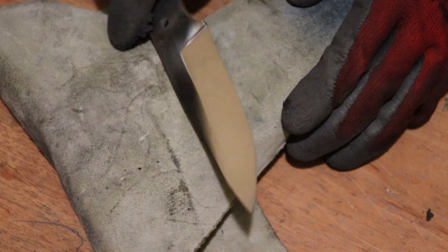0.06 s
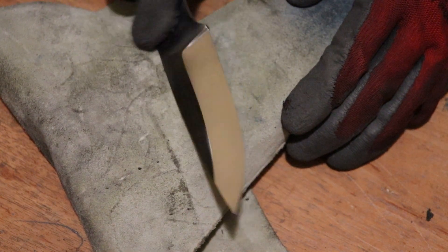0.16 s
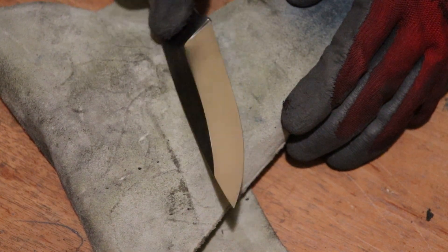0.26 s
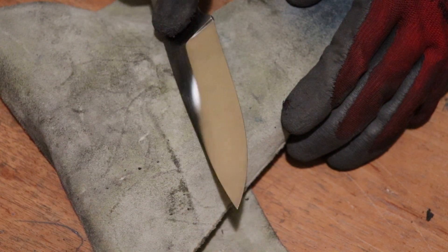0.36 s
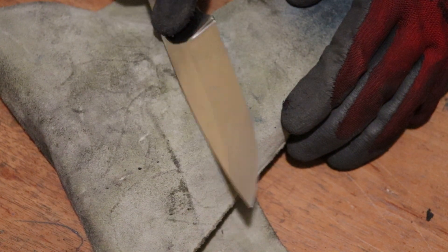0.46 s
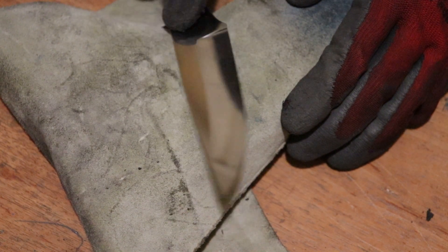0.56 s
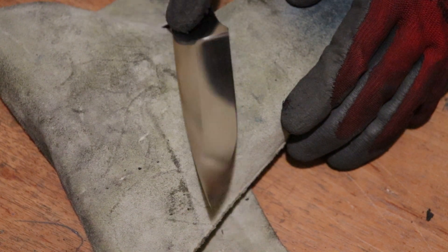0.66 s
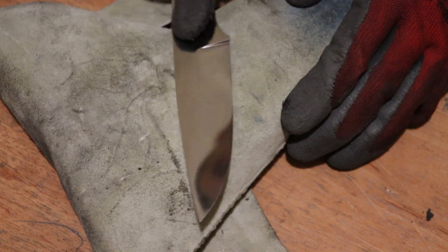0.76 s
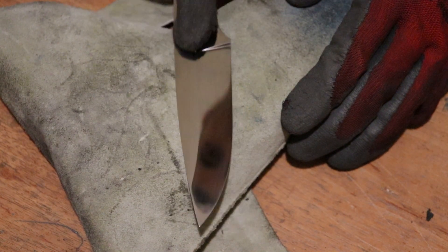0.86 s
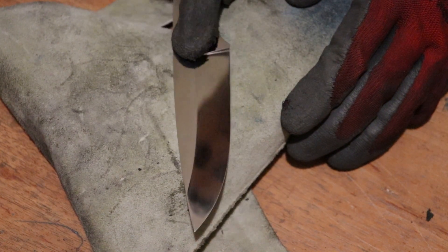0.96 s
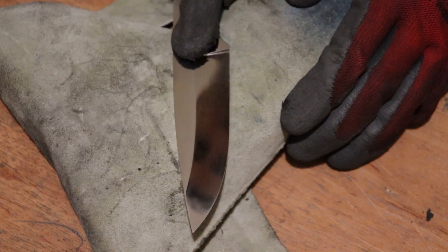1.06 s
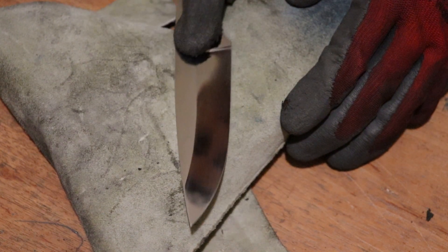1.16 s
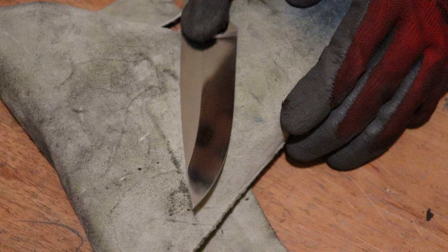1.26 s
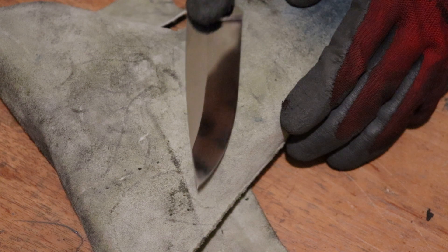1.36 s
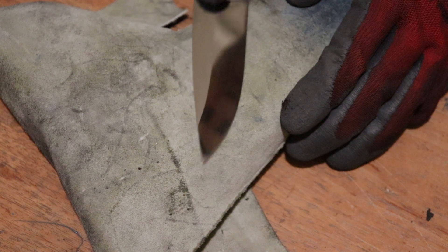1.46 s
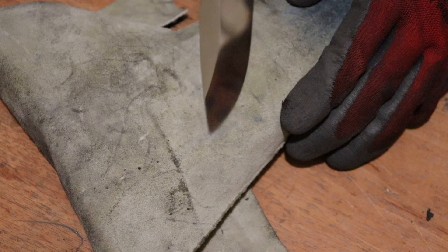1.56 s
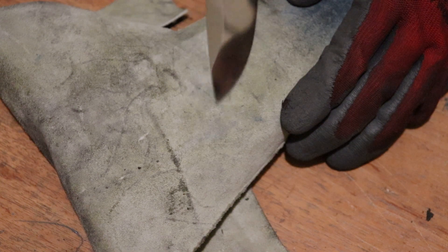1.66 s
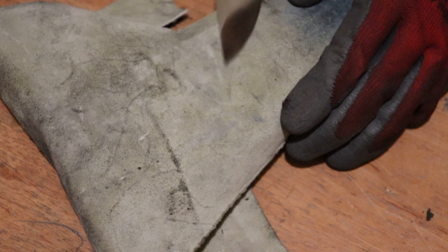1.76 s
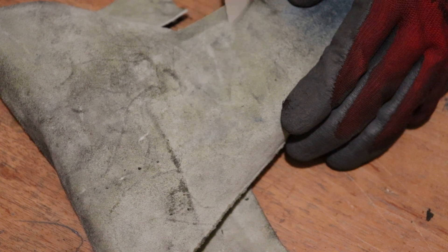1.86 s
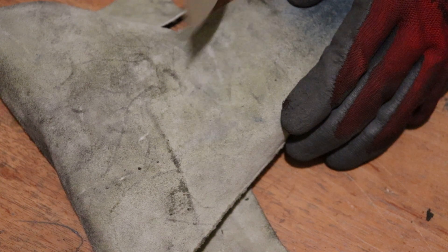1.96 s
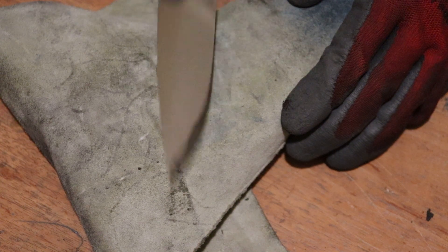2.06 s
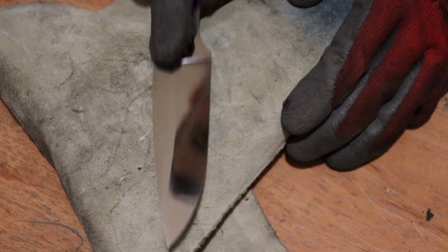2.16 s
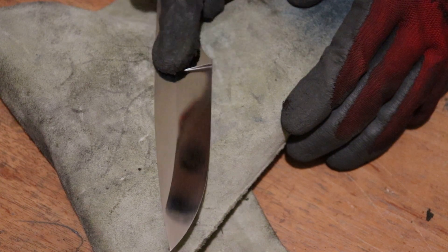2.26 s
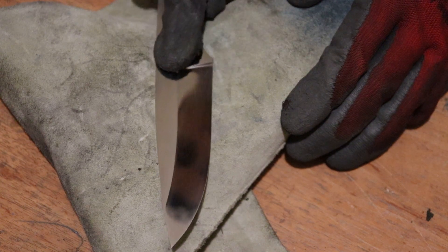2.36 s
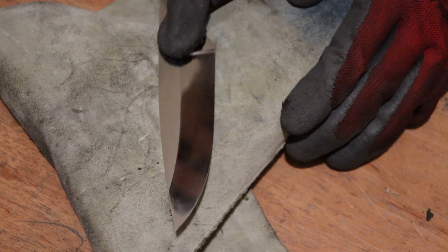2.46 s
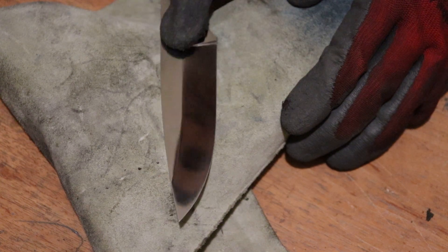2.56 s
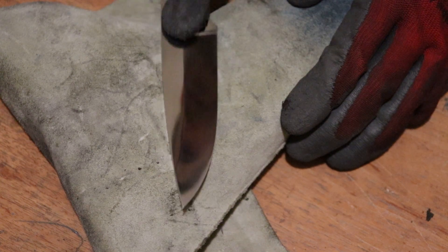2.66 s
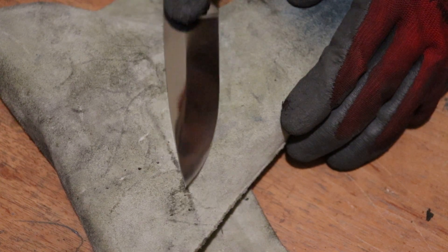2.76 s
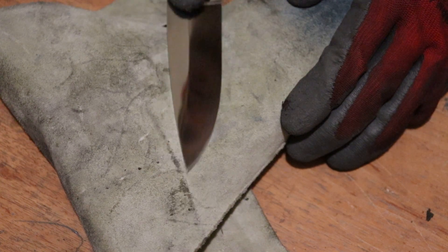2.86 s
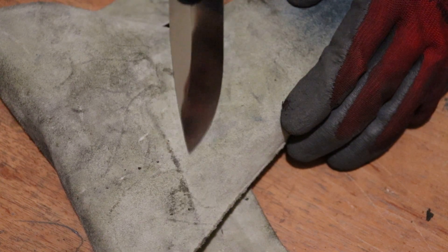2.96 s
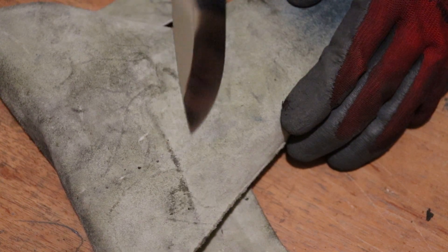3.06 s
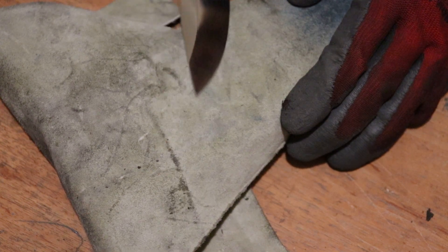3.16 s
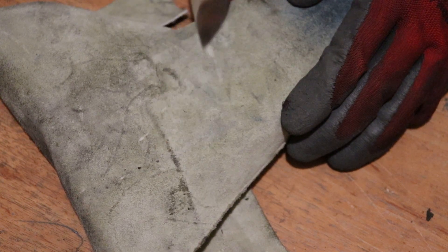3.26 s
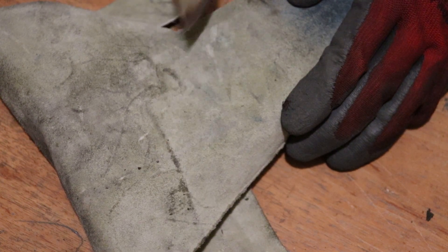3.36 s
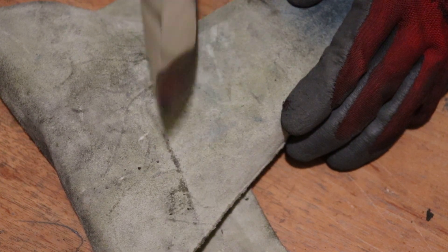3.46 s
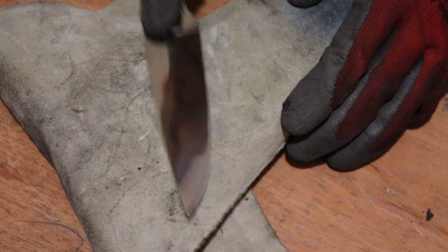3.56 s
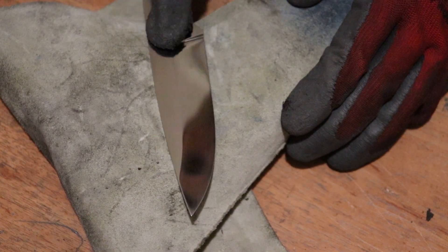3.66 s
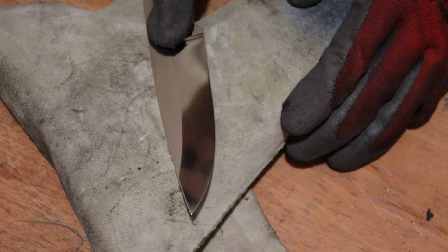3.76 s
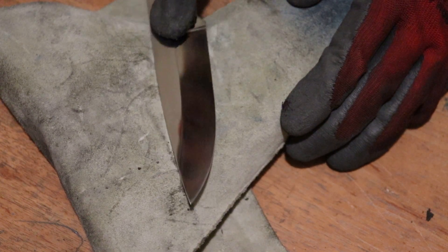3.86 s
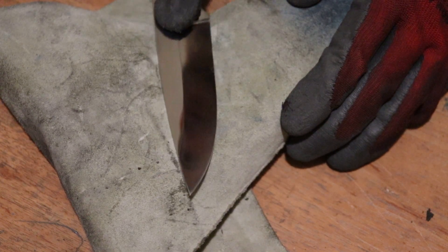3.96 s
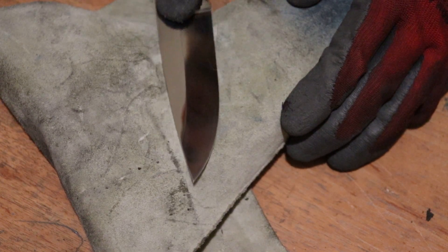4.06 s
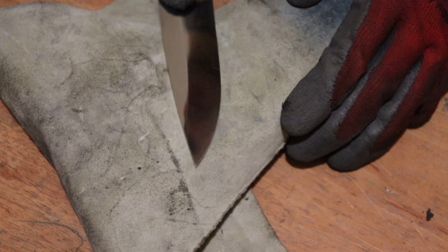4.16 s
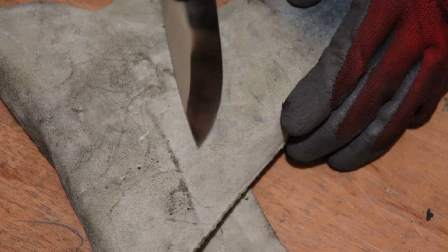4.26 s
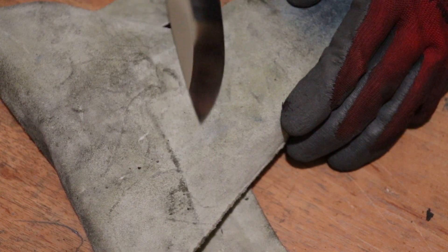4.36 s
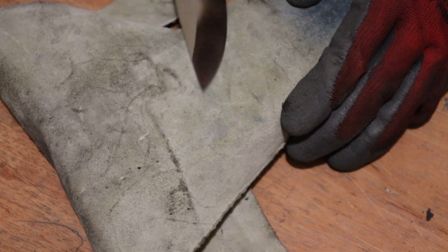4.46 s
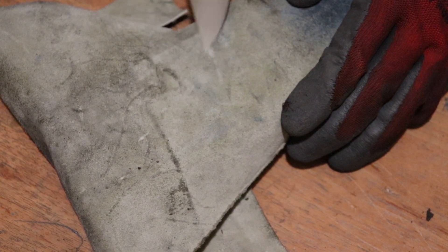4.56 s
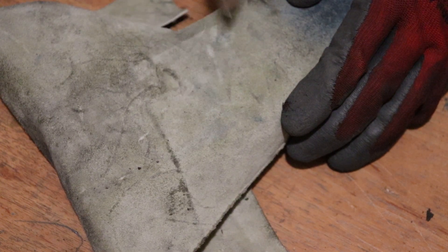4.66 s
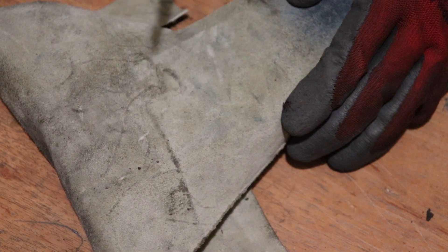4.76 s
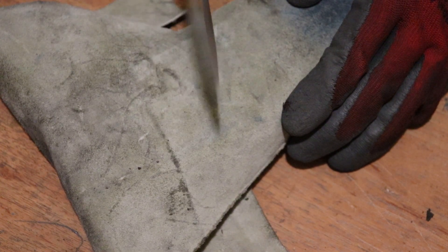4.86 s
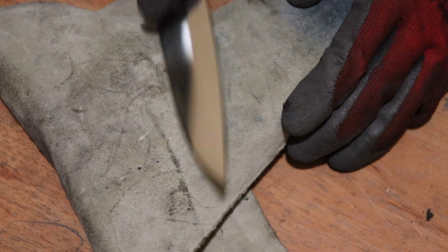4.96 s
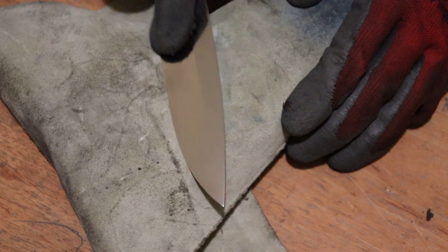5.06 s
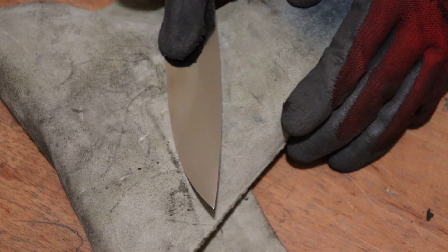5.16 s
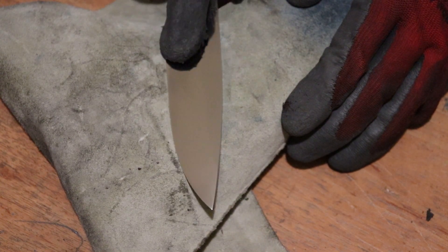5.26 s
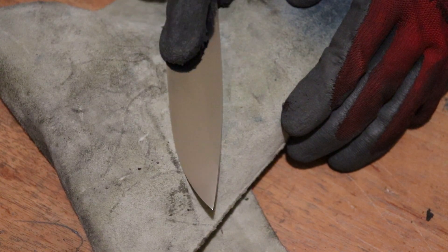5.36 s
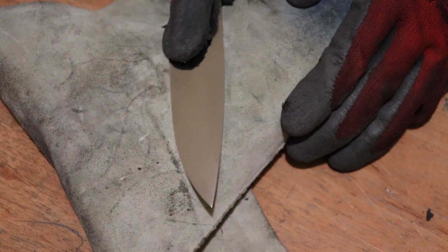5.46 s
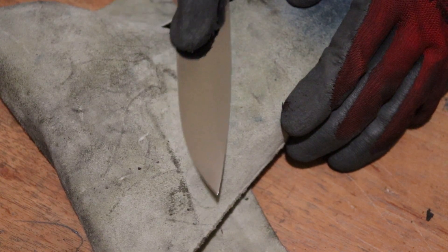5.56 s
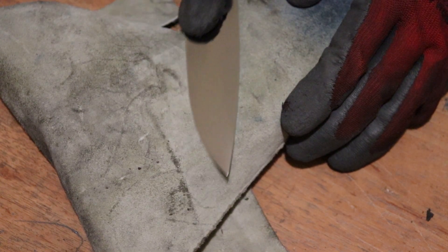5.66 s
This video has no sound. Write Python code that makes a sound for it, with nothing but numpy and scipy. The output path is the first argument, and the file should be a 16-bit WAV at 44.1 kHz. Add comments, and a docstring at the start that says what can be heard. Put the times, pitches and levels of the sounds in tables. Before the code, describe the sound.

Close stereo pickup at a wooden workbench in a small room, with constant murmur and hiss. A gloved hand sets a knife on a leather mat five times: soft, loud and sharp, muffled, medium, soft. The wood rings briefly after each. Low, dull rubbing strokes and small ticks lie between; near the end the glove crackles dryly on the handle, with a thin steel ping.

```python
"""Steady hiss is heard first and lies under it all. A steel knife is laid five times on a leather mat
on a wooden workbench: each landing is a hiss of slapped leather and a thump of the bench top, whose
ringing wood is made of fading sine waves, with noise for the answer of a small workshop.
In between come short strokes of dull, low rubbing, and the gloved hand crackles and snaps on the handle as
it turns the knife (shaped noise). Small ticks and thin steel pings are single fading tones, the ticks with noise."""
import sys
import numpy as np
from scipy import signal
from scipy.fft import rfft, irfft
from scipy.io import wavfile

SR = 44100
rng = np.random.default_rng(int(sys.argv[2]) if len(sys.argv) > 2 else 0)


def to_wav(sig):
    """Store sig (one row per channel, or 1-D mono) as 16-bit WAV at the path in sys.argv[1].

    Samples outside -1..1 are clipped; the rate is SR.
    """
    pcm = np.clip(np.atleast_2d(sig), -1, 1) * 32767
    pcm = np.round(pcm).astype(np.int16)
    wavfile.write(sys.argv[1], SR, pcm.T)  # frames by channels


N = 252638
TIME, HZ = np.arange(N) / SR, np.fft.rfftfreq(N, 1 / SR)

# The knife landing on the mat. Each row: start in seconds, force in dB, hardness of the contact in Hz,
# band favoured by the spot struck in Hz, lift of that band in dB, then how strongly the top flexes,
# the top rings, the room answers, the bench sways and the bench rocks, each in dB.
LANDINGS = [(0.1945, -18.5, 223.3, 198, 2, 0, -3, 4, 8.5, -3),
            (0.6146, -2.5, 1890, 840, 2, -9, 0, 2.5, 3.5, 3.5),
            (2.31, -6, 256, 490, 6.5, 0.5, -5, 1, -6, -6),
            (3.6867, -6, 418, 1320, 9.5, 0.5, -3, 1.5, -0.5, -2.5),
            (5.1640, -14, 203, 435, 8.5, 1, -4.5, -0.5, -9, -15)]


def amp(db):
    """Turns decibels into a factor to multiply by."""
    return 10 ** (np.asarray(db) / 20)


def unit(x):
    """Scales a sound to an average strength (rms) of 1."""
    return x / np.sqrt(np.mean(x ** 2) + 1e-20)


def read(points, hz):
    """Reads values between the points of a table, along a logarithmic frequency axis."""
    f, value = np.transpose(points)
    return np.interp(np.log(hz + 1), np.log(f + 1), value)


def add(mix, s, sound):
    """Mixes a sound in, starting at s seconds."""
    part = mix[:, round(s * SR):][:, :sound.shape[-1]]
    part += sound[..., :part.shape[1]]


def pair(x, same):
    """Makes two unrelated channels partly alike: 0 is unrelated, 1 is nearly the same."""
    same = np.clip(same, -.999, .999)
    right = same * x[0] + np.sqrt(1 - same ** 2) * x[1]
    return np.array([x[0], right])


def colour(x, db, same):
    """Gives two channels a balance of low and high and a likeness, at rms 1."""
    spectrum = pair(rfft(x), same) * amp(db)
    return unit(irfft(spectrum, N))


def friction(per_s, spread_db, smooth):
    """Rubbing: countless tiny slips of uneven size, each a fading burst, over a smooth hiss."""
    starts = rng.random(N) < per_s / SR
    size = amp(spread_db * np.minimum(rng.exponential(1, N), 4)) * starts
    fade_s = 0.00079
    bursts = signal.lfilter([1], [1, -np.exp(-1 / (fade_s * SR))], size)
    crackle = unit(bursts) * rng.standard_normal((2, N))
    hiss = smooth * rng.standard_normal((2, N))
    return unit(crackle + hiss)


def pushes(rows, lead, edge_db, curve):
    """Each push of the hand builds for the share lead of its length, then eases; its ends lie edge_db down."""
    power = np.zeros(N)
    for s, length, db in rows:
        side_s = length * np.where(TIME < s, lead, 1 - lead)
        drop_db = edge_db * abs((TIME - s) / side_s) ** curve
        power += amp(db - drop_db) ** 2
    return np.sqrt(power)


def struck(modes, t, apart_rad=0):
    """Fading sines that start together; the higher ones are less in step between left and right."""
    hz, db, t60 = np.transpose(modes)[:, :, None]
    side = np.array([-1, 1])[:, None, None]
    skew = side * apart_rad * hz / 1000 * rng.choice([-1, 1], hz.shape)
    waves = amp(db - 60 * t / t60) * np.sin(2 * np.pi * hz * t + skew)
    return waves.sum(1)


def wavelets(modes, t, side):
    """Broad resonances that swell and die within a few cycles; negative side is left, positive right."""
    total = 0
    for hz, db, peak_s, right_db in modes:
        swell = (t / peak_s * np.exp(1 - t / peak_s)) ** 2
        total = total + amp(db + side * right_db / 2) * swell * np.sin(2 * np.pi * hz * t)
    return total


def floor():
    """Steady room murmur and microphone hiss: noise that never changes in level."""
    # Each row: frequency in Hz, relative level in dB per Hz.
    hiss_balance = [(12, -44.5), (20, -26), (49, -9.5), (85, -2.5), (239, -6.5), (334, -5), (374, -6),
                    (407, -6), (494, -7), (653, -9.5), (730, -7.5), (863, -7.5), (2490, -12), (4730, -14.5),
                    (15700, -22)]
    # Each row: frequency in Hz, likeness of left and right from 0 to 1.
    hiss_likeness = [(60, 0.78), (180, 0.16), (550, 0.29), (1650, 0.11), (4970, 0.033), (15000, 0.023)]
    noise = rng.standard_normal((2, N))
    return amp(-51.5) * colour(noise, read(hiss_balance, HZ), read(hiss_likeness, HZ))


def room_tail(onset_s, same_hz):
    """Dense reflections build up, each band dying at its own speed; bass is alike in both ears."""
    # The workshop's answer to a knock. Each row: frequency in Hz, relative level in dB per Hz.
    room_balance = [(40, -35.5), (70, -29), (130, -3), (200, 6.5), (300, -1), (420, 0), (600, -1),
                    (800, 8.5), (1050, 2), (1400, -7), (1800, -4.5), (3000, -16.5), (6000, -9.5),
                    (15000, -29)]
    # Each row: frequency in Hz, time to fall by 60 dB in seconds.
    room_fade = [(70, 0.23), (220, 0.61), (400, 0.33), (900, 0.31), (2000, 0.35), (8000, 0.19)]
    hz, t, z = signal.stft(rng.standard_normal((2, SR)), SR, nperseg=1024)
    z = pair(z, 1 / (1 + (hz[:, None] / same_hz) ** 2))
    z = z / np.sqrt(abs(z))  # many paths even out the level
    z = z * amp(read(room_balance, hz)[:, None] - 60 * t / read(room_fade, hz)[:, None])
    tail = signal.istft(z, SR, nperseg=1024)[1][:, :SR]
    build_up = 1 - np.exp(-(np.arange(SR) / SR / onset_s) ** 2)
    return unit(tail * build_up)


def rubbing():
    """Dull, low rubbing in short strokes, as of leather and a moving hand: tiny slips shaped by each stroke."""
    # Each row: time of the strongest moment in seconds, length in seconds, level in dB.
    strokes = [(.85, 0.36, -48), (2.58, 0.19, -62), (2.805, 0.2, -54.5), (3.38, 0.065, -58),
               (4.68, 0.088, -55)]
    # The dull sound of the rubbing. Each row: frequency in Hz, relative level in dB per Hz.
    rub_balance = [(40, -27.5), (70, 3), (200, 8.5), (400, 3), (1000, 1), (2700, -0.5), (7000, -9.5),
                   (15000, -33)]
    slips = friction(per_s=1500, spread_db=2.5, smooth=1.6)
    effort = pushes(strokes, lead=0.71, edge_db=7, curve=2.4)
    return effort * colour(slips, read(rub_balance, HZ), 0.8)


def glove(level_db=-1, left_db=-1.5):
    """The glove sticks and slips on the handle in a dry crackle as the knife is turned."""
    # Each row: time of the fastest slip in seconds, length in seconds, level in dB before level_db and left_db.
    turns = [(4.69, 0.11, -43), (4.765, 0.16, -40.5), (4.83, 0.086, -39), (4.953, 0.063, -42.5),
             (5.003, 0.13, -40)]
    # The sound of the glove. Each row: frequency in Hz, relative level in dB per Hz.
    glove_balance = [(300, -13), (600, -23), (1000, -9), (1600, -7), (2250, -2), (3000, -5), (4500, -11),
                     (7000, -14), (9000, -18), (15500, -24)]
    slips = friction(per_s=800, spread_db=2, smooth=.9)
    effort = pushes(turns, lead=0.36, edge_db=12.5, curve=0.6)
    sides = amp([[level_db + left_db], [level_db]])
    return sides * effort * colour(slips, read(glove_balance, HZ), 0.58)


def snaps(t60=0.015, sharpness=4.3, fizz=0.43, top_hz=7000, echo_db=-24, echo_t60=0.37, left_db=-2):
    """The glove lets go with a dry snap: noise with one broad peak, and its scatter from the room."""
    # Each row: start in seconds, level in dB before the fade and left_db, brightest frequency in Hz.
    releases = [(4.6748, -35.5, 3240), (4.726, -35.5, 2060), (4.754, -37, 2300), (4.7669, -32.5, 2340),
                (4.8063, -28.5, 2360), (4.811, -33.5, 2630), (5.0333, -31.5, 1530), (5.0554, -39, 2540)]
    out, t = np.zeros((2, N)), np.arange(SR // 6) / SR
    fade = amp(-60 * t / t60) + amp(echo_db - 60 * t / echo_t60)
    for s, db, hz in releases:
        noise = pair(rng.standard_normal((2, len(t))), 0.77)
        noise = unit(signal.lfilter(*signal.butter(2, top_hz, fs=SR), noise))
        peak = unit(signal.lfilter(*signal.iirpeak(hz, sharpness, SR), noise))
        add(out, s, amp(db) * unit(peak + fizz * noise) * fade)
    return amp([[left_db], [0]]) * out


def ticks(snap=0.19, echo_db=-25, echo_t60=0.29, top_hz=5000):
    """Handle and blade edge tick: one fading tone, a little noise and a faint scatter from the room."""
    # Each row: start in seconds, level of the tone in dB, its frequency in Hz,
    # time to fall by 60 dB in seconds.
    small_hits = [(0.3644, -27.5, 2060, 0.0023), (0.5825, -26, 1410, .02), (0.9124, -37, 1580, 0.027),
                  (1.213, -36, 1040, 0.025), (1.211, -42, 2860, 0.013), (2.82, -49, 2560, .022),
                  (3.6794, -36, 2100, 0.0066), (3.688, -34, 2330, .016), (5.169, -44, 1530, 0.02)]
    out, t = np.zeros((2, N)), np.arange(SR // 6) / SR
    for s, db, hz, t60 in small_hits:
        noise = pair(rng.standard_normal((2, len(t))), 0.81)
        noise = unit(signal.lfilter(*signal.butter(2, top_hz, fs=SR), noise))
        tone = struck([(hz, 0, t60)], t, apart_rad=0.064)
        click = snap * noise * amp(-60 * t / t60)
        echo = unit(signal.lfilter(*signal.iirpeak(hz, 2, SR), noise)) * amp(echo_db - 60 * t / echo_t60)
        add(out, s, amp(db) * (tone + click + echo))
    return out


def pings(t60=0.16):
    """The steel pings thinly when the grip jolts it: one high tone, soon damped by the glove."""
    # Each row: start in seconds, level in dB, frequency in Hz.
    jolts = [(0.583, -47.5, 6360), (4.8075, -41.5, 9140), (4.82, -48, 8730)]
    out, t = np.zeros((2, N)), np.arange(SR // 3) / SR
    for s, db, hz in jolts:
        add(out, s, amp(db) * struck([(hz, 0, t60)], t, apart_rad=0.1))
    return out


def slaps(level_db=-34, follow=0.31, rise_s=0.0026, t60=.09):
    """The blade slaps the leather as it lands: a brief hiss that grows with the force."""
    # The sound of the leather. Each row: frequency in Hz, relative level in dB per Hz.
    slap_balance = [(300, -3.5), (1300, 0.5), (2200, -10), (4500, -16), (15000, -28)]
    gain = np.zeros(N)
    for s, db, *_ in LANDINGS:
        t = np.maximum(TIME - s, 0)
        rise = 1 - np.exp(-(t / rise_s) ** 2)
        gain += rise * amp(level_db + follow * db - 60 * t / t60)
    return gain * colour(rng.standard_normal((2, N)), read(slap_balance, HZ), .5)


def contact(x, hz, slope, spot_hz, spot_db):
    """Leather softens the blow above its hardness hz, and the spot struck favours one band."""
    size = 2 * SR
    f = np.fft.rfftfreq(size, 1 / SR)
    lift = amp(spot_db * np.exp(-(np.log2((f + 1) / spot_hz) / 0.74) ** 2))
    log_gain = np.log(lift) - .5 * np.log(1 + (f / hz) ** (2 * slope))
    # folding the cepstrum forward makes a filter that never sounds before the blow
    cepstrum = irfft(log_gain)[:SR] * np.r_[1, np.full(SR - 1, 2)]
    response = np.exp(rfft(cepstrum, size))
    return irfft(rfft(x, size) * response)[:, :SR]


def knocks(tail_db=-33, lag_s=.0001, ring_onset_s=0.0096, radiate_hz=85):
    """Each landing pushes the top down: a thump, then the ring of the wood, the sway and the room."""
    # The thump of the top under the blow. Each row: frequency in Hz, relative level in dB,
    # time to its peak in seconds, lean to the right in dB (before the side setting scales it).
    thump_modes = [(245, -5.5, 0.0037, -1.5), (924, 2, 0.0013, 5), (1920, 2.5, 0.00051, 2),
                   (3380, 2, 0.0003, 1.5)]
    # Four sets of fading tones: the boards flex, most when struck between their supports; the top rings on;
    # the whole bench sways on its legs; it rocks under a square blow.
    # Each row: frequency in Hz, relative level in dB, time to fall by 60 dB in seconds.
    flex_modes = [(137, -28, .19), (265, -24, .17), (295, -14, .2), (313, -26, .21), (388, -26, .39)]
    ring_modes = [(161, -35, .5), (186, -27, .58), (209, -23, .58), (219, -28, .33), (248, -33, .5),
                  (348, -39, .43), (463, -27, .24), (511, -27, .33), (544, -32, .32), (573, -28, .19),
                  (603, -23, .29), (698, -17, .31), (732, -20, .23), (758, -17, .25), (788, -19, .21),
                  (824, -26, .34), (873, -30, .25), (933, -24, .23), (957, -19, .2), (988, -22, .29),
                  (1039, -21, .19), (1126, -25, .19), (1215, -25, .21), (1346, -36, .3), (1694, -32, .27),
                  (1777, -31, .25), (2065, -44, .4), (2343, -28, .5)]
    sway_modes = [(62, -34, .7), (73, -30, .68)]
    rock_modes = [(94.5, -24, .58), (104, -33, .35)]
    out, t = np.zeros((2, N)), np.arange(SR) / SR
    spread = 1 - np.exp(-(t / ring_onset_s) ** 2)  # waves must cross the top before it rings
    left = wavelets(thump_modes, np.maximum(t - lag_s, 0), side=-0.89)
    right = wavelets(thump_modes, t, side=0.61)
    # a board radiates little deep bass
    thump = signal.lfilter(*signal.butter(2, radiate_hz, "high", fs=SR), np.array([left, right]))
    flex = spread * struck(flex_modes, t, apart_rad=.45)
    ring = spread * struck(ring_modes, t, apart_rad=.45)
    sway = spread * struck(sway_modes, t, apart_rad=.45)
    rock = spread * struck(rock_modes, t, apart_rad=.45)
    for s, db, hard_hz, spot_hz, spot_db, flex_db, ring_db, room_db, sway_db, rock_db in LANDINGS:
        wood = thump + amp(flex_db) * flex + amp(ring_db) * ring
        bench = amp(sway_db) * sway + amp(rock_db) * rock
        tail = amp(tail_db + room_db) * room_tail(onset_s=0.003, same_hz=766)
        blow = contact(wood + bench + tail, hard_hz, 2.06, spot_hz, spot_db)
        add(out, s, amp(db) * blow)
    return out


def scene():
    """Knife, bench and workshop together."""
    background = floor()
    handling = rubbing() + glove() + snaps() + ticks() + pings()
    landing = slaps() + knocks()
    return background + handling + landing


def record(dry):
    """Strong peaks are rounded off as the input overloads, then the highest treble is cut."""
    clipped = dry / (1 + dry ** 6) ** (1 / 6)
    low_pass = signal.firwin(511, 15800, window=("kaiser", 9), fs=SR)  # cut-off in Hz
    return signal.oaconvolve(clipped, low_pass[None], "same")


dry = scene()
out = record(dry)
to_wav(out)
```